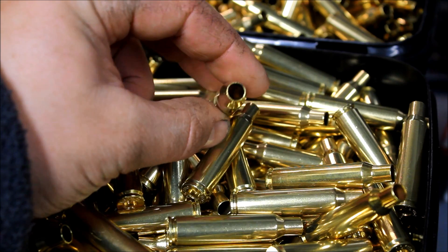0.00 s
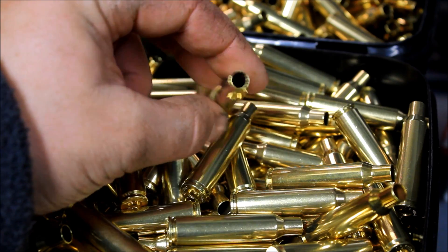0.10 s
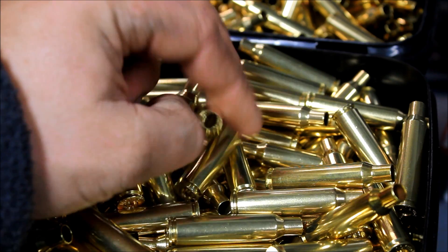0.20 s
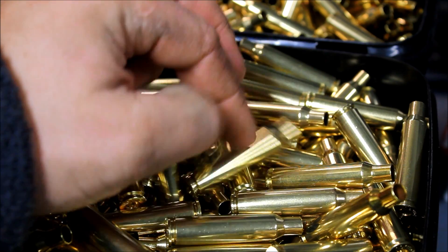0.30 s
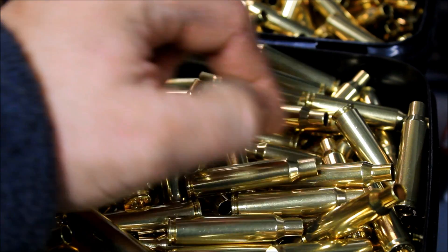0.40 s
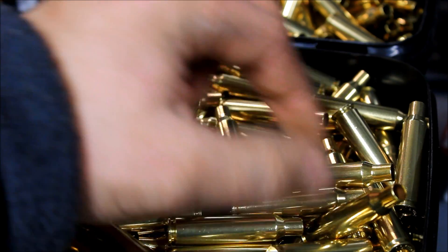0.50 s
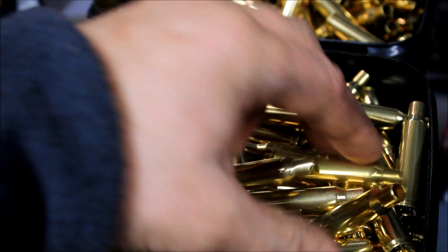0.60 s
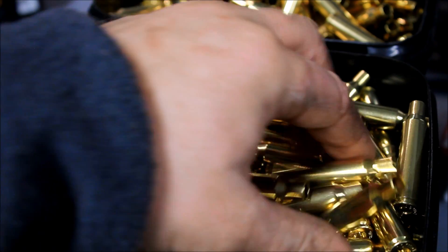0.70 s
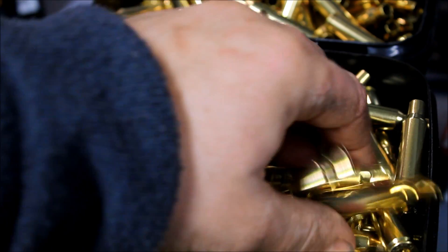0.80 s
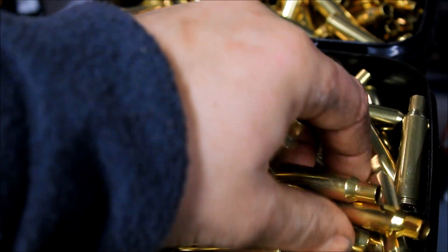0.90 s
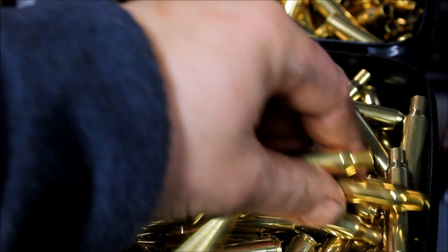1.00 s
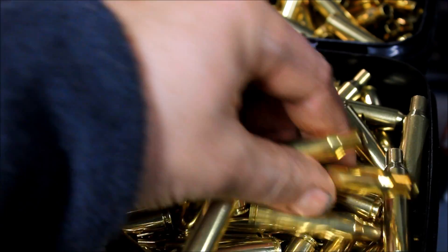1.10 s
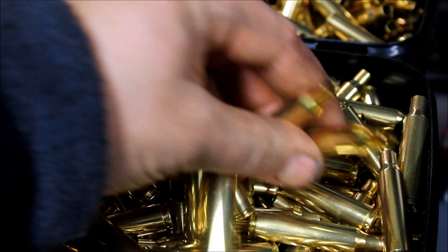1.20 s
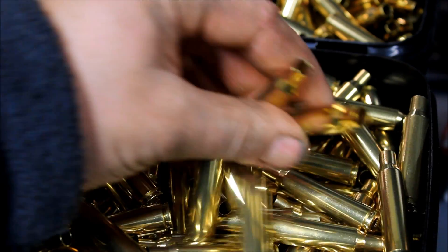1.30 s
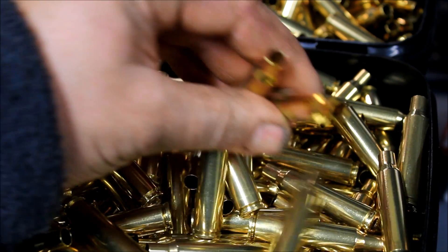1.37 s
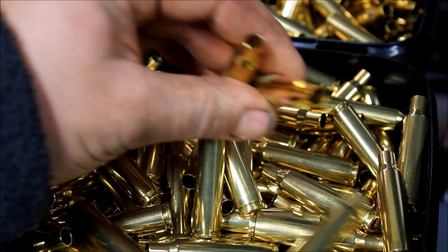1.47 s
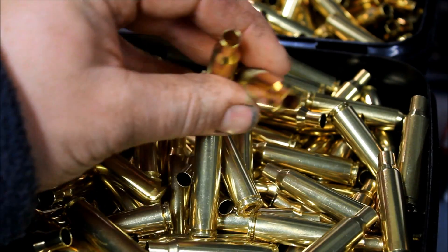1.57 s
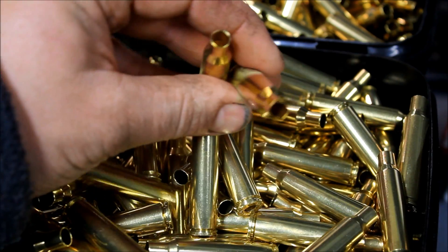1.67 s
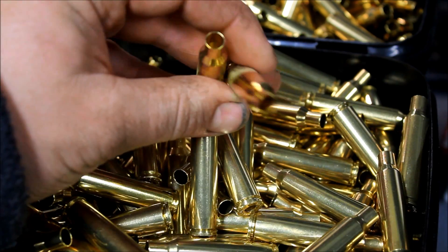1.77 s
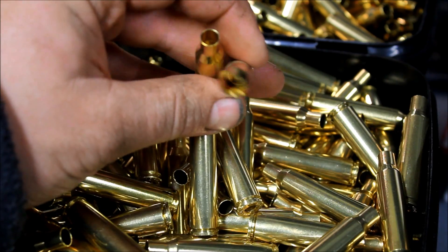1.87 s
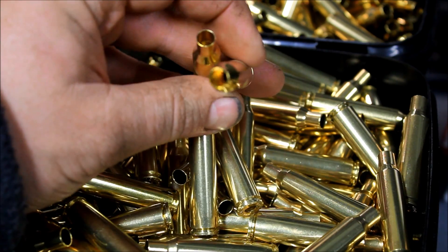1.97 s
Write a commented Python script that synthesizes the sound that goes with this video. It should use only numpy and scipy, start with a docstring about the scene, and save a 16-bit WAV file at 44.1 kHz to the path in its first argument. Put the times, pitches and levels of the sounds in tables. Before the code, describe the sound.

Empty brass cartridge cases clink sharply, close to the microphone, as a hand rummages in a plastic tub. Faint hum first; bright clinks from 0.15 to 0.5 seconds, a short gap, then a dense rattling clatter from 0.68, strongest near 0.88, with small hollow pops and dull knocks. Scattered ringing clinks follow, clustering near 1.4, thinning after 1.6 and nearly gone by 1.8. Short room tail.

```python
"""In a small workshop with a faint hum, a hand rummages through a plastic tub of empty brass cartridge
cases and lifts a few out, close to the microphone. Each collision clacks, sets a case's thin wall ringing
in three high modes, pops the air inside it and thuds into the tub. Loose cases rattle under the fingers
as many light random contacts, hard blows knock wedged cases, and a short diffuse tail answers the brass.
Room tone, noise with a wavering hum, lies beneath and sinks in level around one second."""
import sys
import numpy as np
from scipy import signal
from scipy.fft import rfft, irfft
from scipy.io import wavfile

SR = 44100
rng = np.random.default_rng(int(sys.argv[2]) if len(sys.argv) > 2 else 0)


def bounce(signal):
    """Save signal as a 16-bit WAV file at the path given by the first command-line argument."""
    frames = np.transpose(np.atleast_2d(signal))
    limited = np.clip(frames, -1, 1)
    pcm = np.round(limited * 32767).astype(np.int16)
    wavfile.write(sys.argv[1], SR, pcm)


N = 90405  # length in samples
T = np.arange(SR // 3) / SR  # time axis of one struck sound, s


def amp(db):
    """Decibels to gain."""
    return 10 ** (np.asarray(db) / 20)


def evened(x):
    """Scales to an rms of one."""
    return x / np.sqrt(np.mean(x ** 2) + 1e-20)


def blow(x):
    """Scales a short sound to the energy of a hundredth of a second at an rms of one."""
    return x / np.sqrt(np.sum(x ** 2) * 100 / SR + 1e-20)


def read(points, hz):
    """Reads a table on a logarithmic frequency axis."""
    f, value = np.transpose(points)
    return np.interp(np.log(hz + 1), np.log(f + 1), value)


def envelope(points):
    """Gain over the whole scene from a table of t/s and level/dB."""
    return amp(np.interp(np.arange(N) / SR, *np.transpose(points)))


def add(mix, s, sound):
    """Mixes a sound in at a time in seconds."""
    part = mix[max(round(s * SR), 0):][:len(sound)]
    part += sound[:len(part)]


def mode(hz, t60):
    """One struck resonance, a sine that decays by 60 dB in t60 seconds."""
    decay = np.exp(-np.log(1000) * T / max(t60, .002))
    return np.sin(2 * np.pi * hz * T) * decay


def colour(x, points, size=2048):
    """Causal minimum-phase filter with the given spectrum."""
    log_gain = np.log(amp(read(points, abs(np.fft.fftfreq(size, 1 / SR)))))
    taps = np.fft.ifft(np.exp(np.conj(signal.hilbert(log_gain)))).real
    return signal.fftconvolve(x, taps[:size // 2])[:len(x)]


# Spectrum of the room's air noise, relative: f/Hz, level/dB per Hz
AIR_NOISE_SPECTRUM = [(25, -7.5), (70, -11), (150, -9.5), (290, 3.5), (500, -4.5), (1000, -7), (2000, -8),
                      (4000, -17), (9000, -26), (16000, -29)]
# Workshop hum, rms before the level curve: f/Hz, level/dB
HUM_TONES = [(101, -57.5), (297, -54.5)]
# Level curve of the whole room tone, which sinks and partly returns: t/s, level/dB
TONE_LEVEL = [(.86, -4), (.95, -12), (1.55, -7.5), (1.85, -6.5)]
AIR_NOISE_DB = -45  # rms before the level curve


def room_tone(waver=0.19):
    """Soft shaped air noise and a faint hum of wavering strength, both following one level curve."""
    t = np.arange(N) / SR
    spectrum = rfft(rng.standard_normal(N))
    spectrum = spectrum * amp(read(AIR_NOISE_SPECTRUM, np.fft.rfftfreq(N, 1 / SR)))
    air = evened(irfft(spectrum, N))
    hum = 0
    for hz, db in HUM_TONES:
        drift = np.interp(t, np.linspace(0, t[-1], num=12), rng.standard_normal(size=12))
        tone = np.sqrt(2) * np.sin(2 * np.pi * (hz * t + rng.random()))
        hum = hum + amp(db) * (1 + waver * drift) * tone
    return (amp(AIR_NOISE_DB) * air + hum) * envelope(TONE_LEVEL)


# Colour of a clack's contact noise, relative: f/Hz, level/dB
CLACK_COLOUR = [(100, -30.5), (400, -12.5), (800, 1.5), (1300, -2), (1900, -1.5), (2900, -2), (4100, 3),
                (4800, -2.5), (5400, -1), (7000, -3.5), (8500, -9), (11000, 0.5), (14000, -18),
                (16000, -12)]
CONTACT_DECAY_S, CHATTER_DECAY_S = 0.005, 0.008  # time to fall to 1/e
CHATTER_DB, CHATTER_PER_S = 11, 5000  # level against the contact, mean rate of rebounds
PILE_DB, PILE_T60_S = -8, .022  # damped resonances of cases wedged in the pile
PILE_LOW_HZ, PILE_HIGH_HZ = 2646, 7010


def clack(size=4096, count=4):
    """A sharp contact, a dying chatter of tiny rebounds and a few damped resonances of the pile."""
    t = T[:size]
    contact = rng.standard_normal(size) * np.exp(-t / CONTACT_DECAY_S)
    rebounds = rng.standard_normal(size) * (rng.random(size) < CHATTER_PER_S / SR)
    chatter = rebounds * np.exp(-t / CHATTER_DECAY_S)
    touch = colour(blow(contact) + amp(CHATTER_DB) * blow(chatter), CLACK_COLOUR)
    pitches = PILE_LOW_HZ * (PILE_HIGH_HZ / PILE_LOW_HZ) ** rng.random(count)
    pile = sum(rng.choice([-1, 1]) * mode(hz, PILE_T60_S)[:size] for hz in pitches)
    return blow(blow(touch) + amp(PILE_DB) * blow(pile))


AIR_HZ, AIR_SCATTER_HZ, AIR_T60_S = 1417.4, 60, 0.037


def air_pop():
    """The air column of an open case sounds once, its pitch scattered from case to case."""
    return blow(mode(AIR_HZ + AIR_SCATTER_HZ * rng.normal(), AIR_T60_S))


# Strength of the stirring, which drives the loose rattle: t/s, level/dB
STIRRING = [(.14, -62), (.2, -44.5), (.24, -41), (.29, -46), (.36, -47.5), (.42, -42), (0.471, -42),
            (.55, -66), (.67, -66), (.71, -27.5), (.79, -39), (.82, -39), (0.868, -21), (.93, -37),
            (1.0, -34.5), (1.06, -34), (1.12, -42), (1.19, -48), (1.26, -46.5), (1.32, -44.5), (1.44, -34),
            (1.52, -57), (1.641, -42.5), (1.71, -60), (1.759, -38), (1.83, -68.5)]
# Wall modes of the loose cases: f/Hz, scatter/Hz, level/dB, t60/s
LOOSE_MODES = [(9900, 230, -3, 0.071), (12850, 230, -6, 0.045), (15600, 130, -15, .04)]
RATTLE_PER_S, RATTLE_SPREAD_DB = 650, 5.5  # mean contact rate, scale of the random extra strength
RATTLE_CLACK_DB, RATTLE_AIR_DB = -1.5, -9


def rattle(count=24):
    """Many light contacts among loose cases, each case with its own tuning, as strong as the stirring."""
    strength = amp(RATTLE_SPREAD_DB * np.minimum(rng.exponential(1, N), 3))
    ticks = (rng.random(N) < RATTLE_PER_S / SR) * rng.choice([-1, 1], N) * strength
    ticks = evened(ticks) * envelope(STIRRING)
    owner = rng.integers(0, count, N)  # which case each contact strikes
    out = np.zeros(N)
    for k in range(count):
        voice = amp(RATTLE_CLACK_DB) * clack()
        add(voice, 0, amp(RATTLE_AIR_DB) * air_pop())
        for hz, scatter_hz, db, t60 in LOOSE_MODES:
            add(voice, 0, amp(db) * blow(mode(hz + scatter_hz * rng.normal(), t60)))
        out += signal.oaconvolve(ticks * (owner == k), voice)[:N]
    return out * np.sqrt(100 / SR)  # undoes the energy scale of blow()


TWIN_SPREAD_HZ, TWIN_DB = 54.4, -6.5  # a slightly oval wall splits each mode in two
PING_DB, PING_T60_S, PING_SCATTER_HZ = -9.5, 0.0024, 735  # bright snap while the cases still touch
NEIGHBOUR_DB, NEIGHBOUR_SCATTER_HZ = -12, 245
NEIGHBOUR_T60_S, NEIGHBOUR_MAX_LAG_S = 0.047, 0.009


def wall(hz, t60, count=4):
    """A split wall mode, with its first snap and the damped rings of the neighbours that it jostles."""
    twin = mode(hz + TWIN_SPREAD_HZ * rng.normal(), t60) * rng.choice([-1, 1])
    out = mode(hz, t60) + amp(TWIN_DB) * twin
    out += amp(PING_DB) * mode(hz + PING_SCATTER_HZ * rng.normal(), PING_T60_S)
    for _ in range(count):
        lag_s = NEIGHBOUR_MAX_LAG_S * rng.random()
        neighbour = mode(hz + NEIGHBOUR_SCATTER_HZ * rng.normal(), NEIGHBOUR_T60_S)
        add(out, lag_s, amp(NEIGHBOUR_DB) * neighbour)
    return out


# Modes of the loaded tub, before random detuning and weighting: f/Hz, level/dB, t60/s
TUB_MODES = [(222.3, -6.5, 0.23), (256, -11.5, 0.19), (287.6, -11, 0.24), (344, -7, 0.092), (395, -6, 0.14),
             (496, -5, 0.14), (593, -5, 0.093), (686.7, 1, 0.13), (884, -2, 0.069)]
BOOM_HZ, BOOM_T60_S = 239.8, 0.085
HEAVY_DB, BOOM_DB, BOOM_GROWTH = -23, 3, 2  # reference thud, boom above it there, boom dB per thud dB


def thud(level_db, uneven_db=3, detune=0.025):
    """The tub's modes, weighted at random for each blow; its bottom booms under heavy blows."""
    sides = 0
    for hz, db, t60 in TUB_MODES:
        weight = rng.choice([-1, 1]) * amp(db + uneven_db * rng.normal())
        sides = sides + weight * mode(hz * (1 + detune * rng.normal()), t60)
    boom_db = HEAVY_DB + BOOM_DB + BOOM_GROWTH * (level_db - HEAVY_DB)
    return amp(level_db) * blow(sides) + amp(boom_db) * blow(mode(BOOM_HZ, BOOM_T60_S))


# Distinct collisions of case on case, levels before the trims below: t/s, first wall mode f/Hz,
# t60/s of the first two modes, first mode level/dB, second mode level/dB, third mode level/dB,
# clack level/dB, air pop level/dB, tub thud level/dB
COLLISIONS = [ (0.1509, 9850, 0.056, -33.5, -40, -60, -41, -46.5, -40.5),
              (0.2132, 9460, .08, -40, -31.5, -28, -35, -62, -36),
              (0.2304, 10200, 0.068, -44, -34, -28, -33.5, -56, -47),
              (0.2372, 9900, 0.035, -26.5, -23, -47, -28.5, -41, -32),
              (0.2524, 9705, 0.17, -11, -25, -23, -28, -49, -40),
              (0.2593, 9900, 0.029, -34, -9, -36.5, -45, -49, -46),
              (0.3235, 10100, 0.036, -13, -9, -23, -21.5, -65, -24),
              (0.3496, 9650, 0.14, -21.5, -20.5, -30, -32, -54, -36),
              (0.3903, 9720, 0.14, -23, -15, -41, -31, -42, -31),
              (.431, 9800, 0.14, -20, -39, -40, -37.5, -40, -32),
              (0.4415, 9690, 0.081, -16, -17, -38, -24, -47, -36),
              (0.4561, 9920, 0.059, -18.5, -11.5, -19, -19, -28, -27.5),
              (0.4983, 9710, 0.12, -26.5, -29.5, -47, -38.5, -44, -65),
              (0.6758, 9650, 0.1, -11.5, -18.5, -35, -27.5, -37, -49),
              (0.6995, 9920, 0.076, -24, -18.5, -45, -26, -49, -53.5),
              (0.7128, 9670, 0.085, -33, -34, -44, -32, -22, -30),
              (0.7292, 9730, 0.17, -26, -12, -37, -33, -47, -34),
              (0.737, 9720, 0.07, -25, -29, -30.5, -27.5, -25, -33),
              (0.7514, 9700, .10, -26, -17, -22, -22.5, -28, -46),
              (.776, 10200, .05, -40, -30, -45, -17.5, -25, -22.5),
              (0.7929, 9960, .05, -31, -21, -48.5, -24, -23.5, -38.5),
              (.802, 9830, 0.034, -20, -33.5, -34, -28, -47.5, -57),
              (0.8317, 9700, .07, -17.5, -25, -24, -21.5, -34, -29),
              (0.8387, 9940, 0.088, -19.5, -21, -37.5, -19.5, -33, -32),
              (0.8608, 10040, .07, -15.5, -22, -27.5, -25.5, -37.5, -43.5),
              (0.8733, 9900, 0.04, -17, -20.5, -34.5, -24.5, -32, -28.5),
              (0.883, 9620, 0.039, -3.5, -10.5, -19, -35, -42.5, -49),
              (0.9018, 9665, 0.23, -14, -19.5, -33.5, -29, -36, -42.5),
              (0.9155, 9700, 0.069, -28, -20.5, -28, -27, -28, -41),
              (0.9448, 9650, 0.097, -40, -46, -47, -31, -29.5, -43.5),
              (1.0255, 9740, 0.077, -16.5, -16.5, -24.5, -21, -25.5, -28.5),
              (1.095, 9700, 0.13, -33, -19, -46, -34.5, -55, -54),
              (1.1038, 9900, 0.12, -13.5, -27, -39, -19.5, -40, -29),
              (1.112, 10030, 0.059, -21, -11, -30, -20.5, -28, -30),
              (1.1694, 10380, 0.11, -35, -47, -53, -32.5, -38, -41.5),
              (1.202, 9625, 0.13, -10.5, -13, -46, -26, -34, -37),
              (1.24, 9940, 0.12, -24.5, -27, -45, -44, -59, -67),
              (1.283, 9540, 0.35, -30.5, -28.5, -43, -31, -54, -44),
              (1.3026, 9620, 0.062, -35, -39.5, -40, -31.5, -29.5, -35),
              (1.3064, 9680, 0.37, -29.5, -38.5, -44, -28.5, -46, -37.5),
              (1.344, 9700, 0.19, -25.5, -23, -42, -35.5, -47, -55),
              (1.3736, 9600, 0.13, -22, -20, -26, -29.5, -50, -40),
              (1.3946, 9700, 0.091, -10.5, -20, -41, -23.5, -37, -31),
              (1.4163, 9736, 0.16, -11, -15, -42, -31, -36.5, -31),
              (1.4311, 9740, 0.091, -18.5, -11.5, -41, -28.5, -41, -37),
              (1.4562, 9690, .25, -35, -26.5, -52.5, -50.5, -59, -65),
              (1.566, 9800, 0.15, -33, -40, -51, -41, -41, -43.5),
              (1.586, 9920, 0.15, -45, -33.5, -53, -37, -26, -43),
              (1.6072, 9740, 0.14, -38, -28.5, -48, -35.5, -46, -39),
              (1.6206, 9810, 0.15, -23.5, -29, -49, -33.5, -43, -48),
              (1.645, 9620, 0.084, -23, -45.5, -35, -35, -48.5, -43),
              (1.7316, 9630, 0.11, -28.5, -30, -54, -31, -55, -41.5),
              (1.7545, 9900, 0.1, -29, -19, -49.5, -27.5, -38, -36.5),
              (1.9186, 10020, .05, -65, -68.5, -66.5, -53.5, -63.5, -72),
              (1.9558, 9540, 0.035, -59, -46, -61, -52.5, -55, -53)]
RING_TRIM_DB, CLACK_TRIM_DB, POP_TRIM_DB, THUD_TRIM_DB = 0.5, -0.5, -4, -3.5
SECOND_HZ, SECOND_SCATTER_HZ = 12980, 60.4
THIRD_HZ, THIRD_SCATTER_HZ, THIRD_T60_S = 15620, 110, 0.081
GRAZE_DB, GRAZE_MAX_LEAD_S = -17, 0.0064  # cases brush just before they strike


def clinks():
    """Each collision rings the wall in three modes, clacks, pops and thuds, led by a light graze."""
    out = np.zeros(N)
    for s, hz, t60, first_db, second_db, third_db, clack_db, pop_db, thud_db in COLLISIONS:
        ring = amp(first_db) * wall(hz, t60)
        ring += amp(second_db) * wall(SECOND_HZ + SECOND_SCATTER_HZ * rng.normal(), t60)
        ring += amp(third_db) * wall(THIRD_HZ + THIRD_SCATTER_HZ * rng.normal(), THIRD_T60_S)
        strike = amp(RING_TRIM_DB) * ring
        add(strike, 0, amp(CLACK_TRIM_DB + clack_db) * clack())
        add(out, s, strike)
        add(out, s - GRAZE_MAX_LEAD_S * rng.random(), amp(GRAZE_DB) * strike)
        add(out, s, amp(POP_TRIM_DB + pop_db) * air_pop())
        add(out, s, thud(THUD_TRIM_DB + thud_db))
    return out


# Hard blows into the pile: t/s, lower knock f/Hz, upper knock f/Hz, knock level/dB,
# tub panel f/Hz, panel level/dB
HARD_BLOWS = [ (0.3237, 3560, 4610, -25, 229, -34), (0.4564, 3610, 5436, -22.5, 390, -32.5),
              (0.8386, 4160, 4520, -23.5, 244, -34), (0.875, 2750, 4190, -25.5, 830, -33),
              (0.9452, 2600, 4000, -37.5, 833, -34.5), (1.104, 3300, 4230, -31, 698, -33.5),
              (1.112, 3970, 4170, -25.5, 770, -30.5)]
WEDGED_T60_S, PANEL_T60_S = 0.027, 0.065


def knocks():
    """Cases driven into the pile ring briefly, wedged between neighbours, and sound one tub panel."""
    out = np.zeros(N)
    for s, low_hz, high_hz, knock_db, panel_hz, panel_db in HARD_BLOWS:
        wedged = mode(low_hz, WEDGED_T60_S) + mode(high_hz, WEDGED_T60_S)
        add(out, s, amp(knock_db) * blow(wedged))
        add(out, s, amp(panel_db) * blow(mode(panel_hz, PANEL_T60_S)))
    return out


# Workshop reverberation: f/Hz, t60/s
ROOM_DECAY = [(200, 0.051), (1400, 0.34), (4000, 0.16), (10000, 0.17), (16000, 0.058)]
ROOM_DB = -13


def workshop(x):
    """A short diffuse tail, each band dying at its own speed."""
    taps = rng.standard_normal(len(T)) * (T > .004)  # silent for the first 4 ms
    hz, t, bands = signal.stft(taps, SR, nperseg=256)
    decay = np.exp(-np.log(1000) * t / read(ROOM_DECAY, hz)[:, None])
    tail = signal.istft(bands * decay, SR, nperseg=256)[1]
    return signal.fftconvolve(x, tail / np.linalg.norm(tail))[:N]


BASS_EDGE_HZ = 240  # the small tub radiates little below this


def scene():
    """Brass in the tub, its reverberation and the room tone."""
    tone = room_tone()
    bass_cut = signal.butter(4, BASS_EDGE_HZ, "highpass", fs=SR, output="sos")
    brass = signal.sosfilt(bass_cut, rattle() + clinks() + knocks())
    return (brass + amp(ROOM_DB) * workshop(brass) + tone)[None]


EDGE_HZ = 16150  # upper band limit


def record(dry):
    """Full-scale limit, then the band limit as a linear-phase low-pass."""
    low_pass = signal.firwin(255, EDGE_HZ, window=("kaiser", 9), fs=SR)
    return signal.oaconvolve(np.clip(dry, -1, 1), low_pass[None], "same")


dry = scene()
out = record(dry)
bounce(out)
```